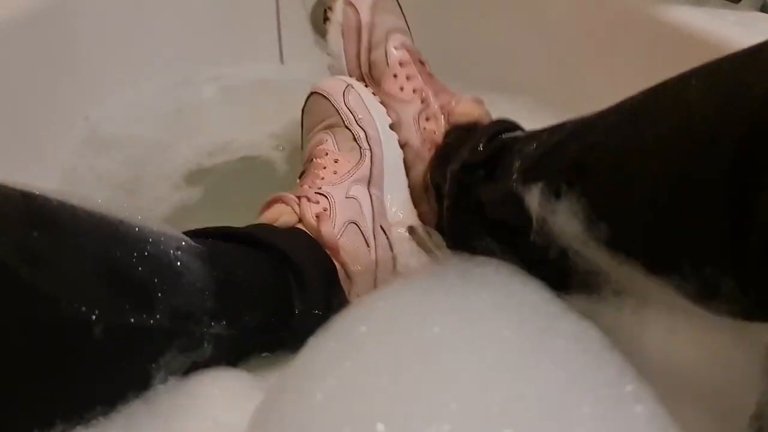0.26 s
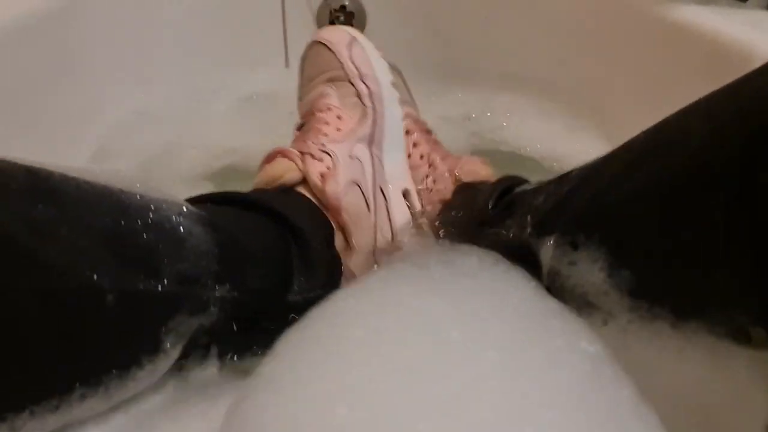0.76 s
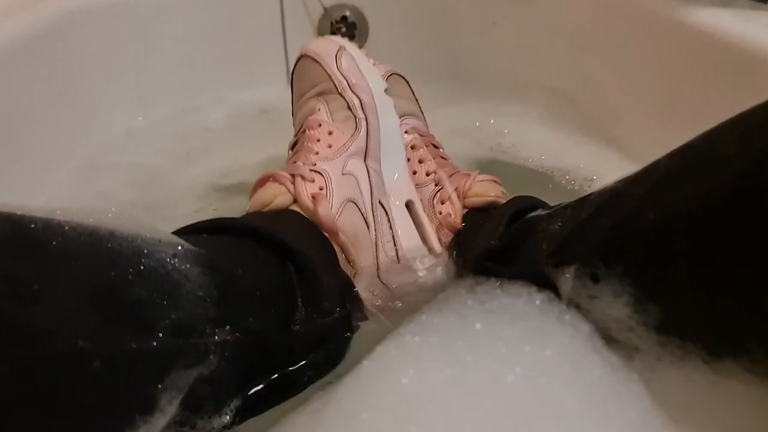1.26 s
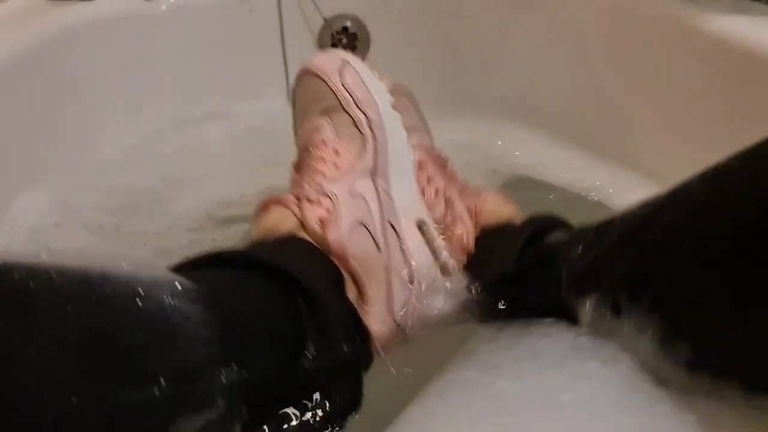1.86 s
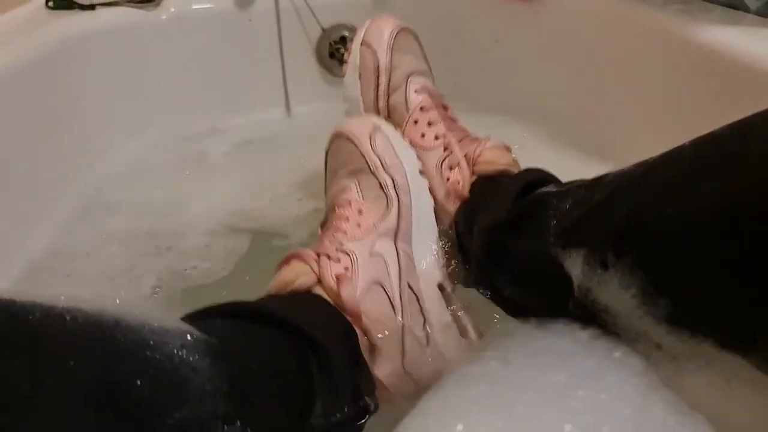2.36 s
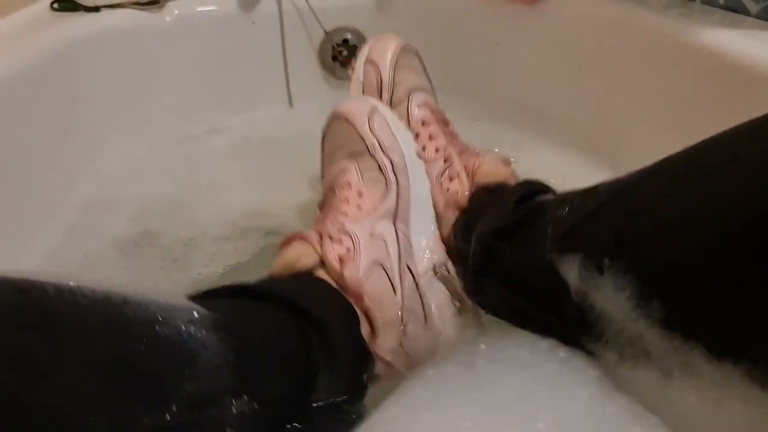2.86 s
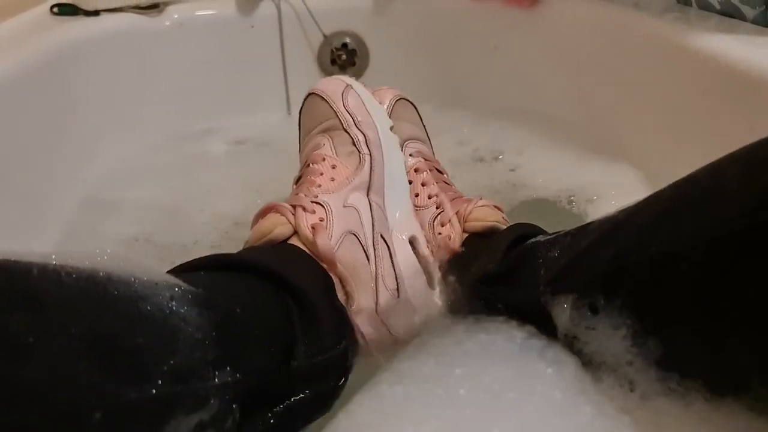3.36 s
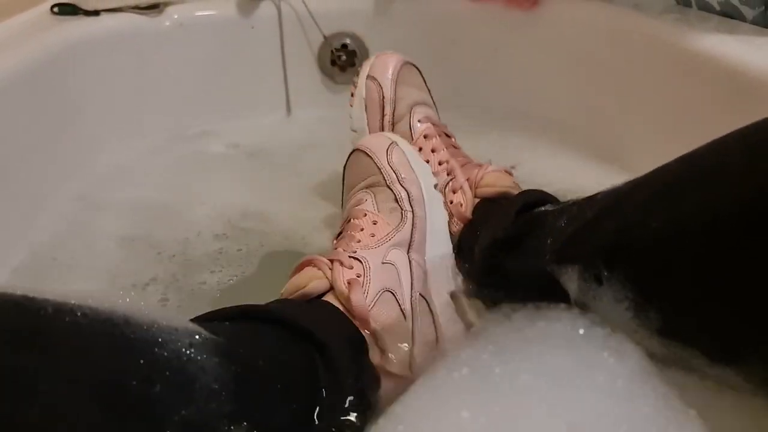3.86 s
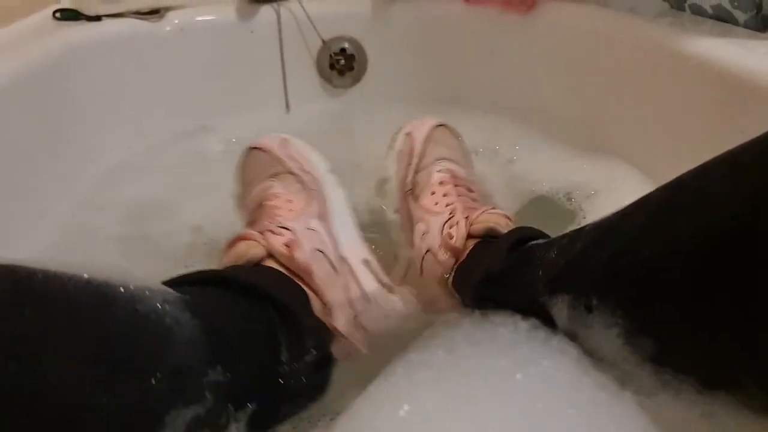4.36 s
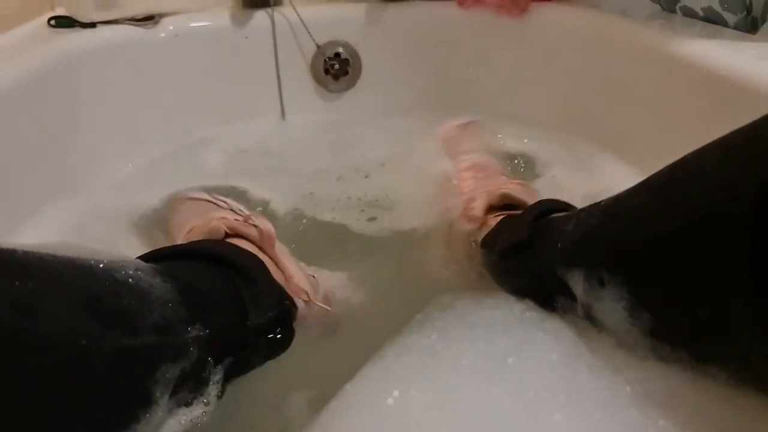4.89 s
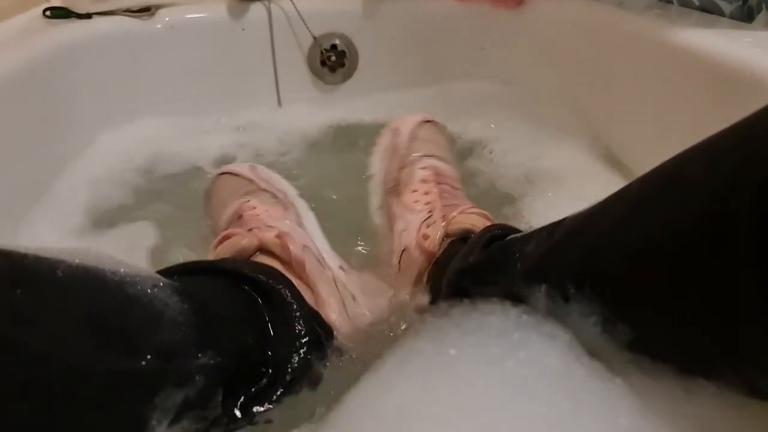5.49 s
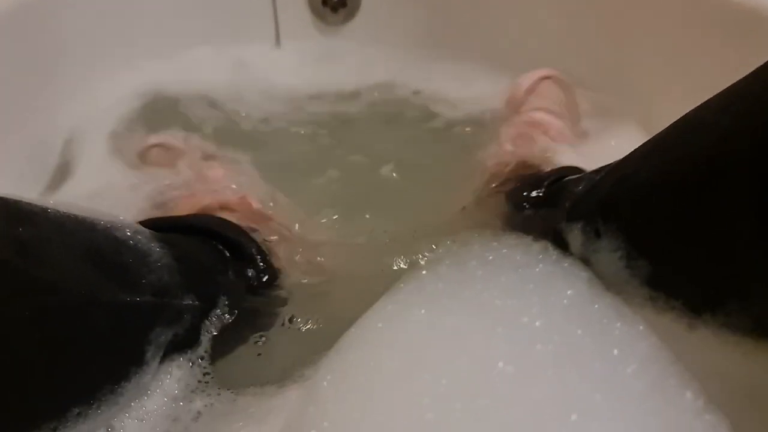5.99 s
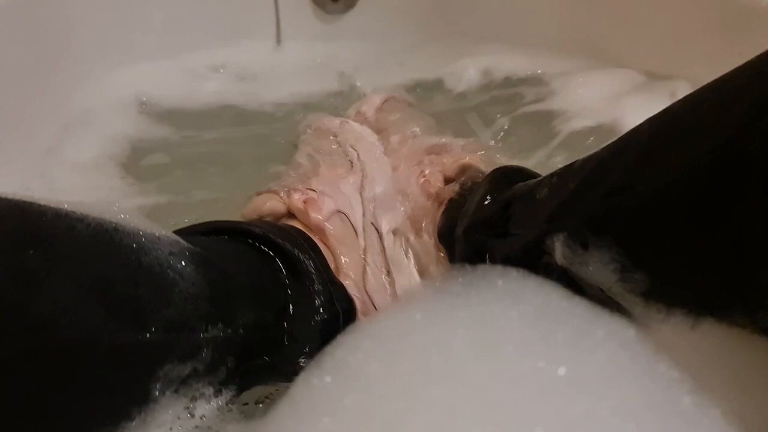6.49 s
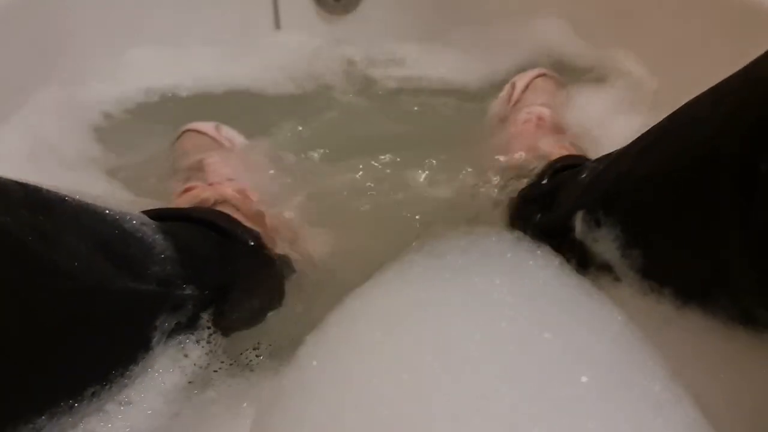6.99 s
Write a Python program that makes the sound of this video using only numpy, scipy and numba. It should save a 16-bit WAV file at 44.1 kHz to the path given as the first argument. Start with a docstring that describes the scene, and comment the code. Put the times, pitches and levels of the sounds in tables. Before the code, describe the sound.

Rubbery, stuttering chirps from soaked shoes come in uneven strokes over faint lapping water, followed by sloshing plunges and bubbling drips in a bathroom.

```python
"""Squeaks come first: two wet rubber-soled shoes rub in a filled bathtub, stroke after stroke, by stick-slip.
Then the feet plunge several times: the tub booms as low-pitched noise, and water churns, sprays and drips.
Churning, spray and drips are decaying sines of rising pitch, as bubbles ring; slaps are short noise bursts.
Tub echoes and a small tiled bathroom ring around a close stereo microphone, over rumble, hiss and foam."""
import sys
import numpy as np
from scipy import signal
from scipy.fft import rfft, irfft, next_fast_len
from scipy.io import wavfile
from scipy.ndimage import map_coordinates
from numba import njit

SR = 44100
rng = np.random.default_rng(int(sys.argv[2]) if len(sys.argv) > 2 else 0)


def master_out(mix):
    """Clip the mix to full scale and print it as 16-bit PCM to the path in sys.argv[1]."""
    frames = np.transpose(np.atleast_2d(mix))
    ceiling = np.clip(frames, -1, 1)
    pcm = np.round(ceiling * 32767).astype(np.int16)
    wavfile.write(sys.argv[1], SR, pcm)


N = 319284
T = np.arange(N) / SR  # time in seconds

# Slips of one sole on the other wet shoe, a few in each stroke of the feet.
# Each row: start in seconds, length in seconds, settled pitch in Hz, start relative to that pitch in
# semitones, level in dB before a common lift, roughness (0 is smooth, about 1 is harsh).
SQUEAKS = [ (-.025, 0.072, 1898, 1, -23.5, 0.82), (0.116, 0.021, 1016, 6.5, -31.5, 0.65),
           (0.324, 0.05, 2370, -2.5, -36.5, 0.38), (0.398, 0.037, 1750, 5, -40, 0.66),
           (0.588, 0.029, 2120, 2.5, -34, 1.1), (.616, 0.038, 3470, 2.5, -17, 0.32),
           (0.619, 0.047, 1786, -1.5, -20.5, 1.03), (.679, 0.039, 1442, 4.5, -18.5, 0.68),
           (0.966, 0.098, 1715, 3.5, -45.5, 0.7), (1.04, 0.036, 2150, 4, -35.5, 1),
           (1.235, 0.039, 2615, 2.5, -34, 1.02), (1.257, 0.057, 2228, 4, -30, 0.82),
           (1.306, 0.052, 1730, 0.5, -39.5, 0.5), (1.696, 0.041, 2200, -6.5, -40, 0.23),
           (1.738, 0.038, 1690, 3.5, -42, 1.1), (1.79, 0.042, 1646, 1.5, -39, 0.75),
           (1.936, 0.06, 1644, 6, -26.5, 0.91), (2.014, 0.032, 3397, 9.5, -20.5, 0.88),
           (2.055, 0.022, 3335, -0.5, -20, 1.2), (2.078, 0.014, 2133, 5, -19.5, 0.76),
           (2.303, 0.031, 2140, -1.5, -27.5, 0.47), (2.325, .02, 1422, 4, -12, 0.38),
           (2.351, 0.026, 1495, .5, -16, 0.52), (2.575, 0.071, 2583, 7, -25, 1.21),
           (2.639, .03, 3800, 0, -14.5, 0.4), (2.642, 0.026, 1740, 3, -18, 0.88),
           (2.686, .055, 2097, 4, -22.5, 1.1), (2.734, .014, 707, 7, -24, 1),
           (2.937, 0.049, 2800, -1, -39.5, 0.94), (3.026, 0.04, 3240, -0.5, -35.5, 1.23),
           (3.064, .028, 1710, 2.5, -32, 1.11), (3.204, 0.052, 1401, 2.5, -35, 0.51),
           (3.22, .036, 1190, 4, -28.5, 1.02), (3.258, 0.027, 1950, 3.5, -25, 0.8),
           (3.286, 0.027, 1841, 1.5, -16, 0.37), (3.307, 0.048, 1363, 4.5, -19, 0.59),
           (3.855, 0.048, 2496, -4.5, -33, 0.69), (3.92, 0.029, 2486, 1.5, -30.5, 1.13),
           (3.934, 0.033, 1465, 4.5, -36, 1.14), (4.32, 0.061, 5800, 0, -63, .4)]
# Stereo balance of the shoes. Each row: frequency in Hz, left minus right in dB.
SHOE_BALANCE = [(600, 11), (1300, -3), (2500, -0.5), (5000, -3.5), (8000, -2), (12000, -1.7)]
# A rough slip puts its energy in the overtones; a high one whistles almost purely.
SMOOTH_OVERTONE_DB, ROUGH_OVERTONE_DB = -5.5, 8
WHISTLE_HZ, WHISTLE_DB_PER_OCTAVE = 2626, -47.5


def shoes(places=3):
    """Moving source: the contact travels during a slip, so the pattern of echoes changes with it."""
    out = np.zeros((2, N))
    for s, length, hz, glide, db, rough in SQUEAKS:
        overtone_db = SMOOTH_OVERTONE_DB + rough ** 2 * (ROUGH_OVERTONE_DB - SMOOTH_OVERTONE_DB)
        overtone_db += WHISTLE_DB_PER_OCTAVE * max(np.log2(hz / WHISTLE_HZ), 0)
        start_hz = hz * 2 ** (glide / 12)
        slip = squeak(length, start_hz, hz, overtone_db, rough)
        slip = slip / np.hypot(1, undb(overtone_db))
        # the contact passes a few places, each with its own echoes
        place = np.linspace(0, places - 1, len(slip))
        lag = rng.uniform(.00005, .0007)
        heard = 0
        for k in range(places):
            nearness = np.sqrt(np.maximum(1 - abs(place - k), 0))
            heard = heard + bathroom(slip * nearness, SHOE_BALANCE,
                                     direct_db=-5.5, tub_db=-5.0, room_db=0.0, lag=lag)
        # the echoes spread the energy of the slip out in time
        same_energy = np.sqrt(np.sum(slip ** 2) / np.sum(heard ** 2))
        add(out, s, undb(db + 2.5) * heard * same_energy)
    return out


# How the shoe radiates the overtones. Each row: frequency in Hz, gain in dB.
SHOE_RADIATION = [(1300, 7), (1800, 10.5), (2500, 4.5), (3700, 0.5), (5000, 1), (6500, -1.5), (8000, -10.5),
                  (11000, -10), (13000, -18), (16000, -24.5)]
SWELL_SHARE = 0.085  # part of a slip that the grip takes to build up
EDGE_SWELL_S = 0.012  # a slip starts as a pure tone; its harsh edge grows with this time constant
CATCH_CHIRP, PITCH_JITTER = 0.261, 0.04086  # shares of the pitch: fall in a catch at roughness 1, and chance
SLIP_BLUR_RAD, TEAR_SHARE = 0.46, 0.8  # at roughness 1: timing scatter of slips, hiss added to the edge


def squeak(length, start_hz, end_hz, overtone_db, rough):
    """Stick-slip friction: the pitch settles as the sole slides, and uneven slips smear the overtones."""
    t = np.arange(int(length * SR)) / SR
    hz = end_hz + (start_hz - end_hz) * np.exp(-3.5 * t / length)
    # the grip catches and lets go about every 14 ms, each time with a small falling chirp
    catch = (70 * t + .3 * walk(t, 60)) % 1
    hz = hz * (1 + rough * CATCH_CHIRP * (.5 - catch) + PITCH_JITTER * walk(t, 260))
    phase = 2 * np.pi * np.cumsum(hz) / SR
    # single slips come early or late, which blurs the high overtones most
    slips = phase + rough * SLIP_BLUR_RAD * walk(t, 1100)
    tone = unit(np.sin(phase + .3 * (slips - phase)))
    overtones = 0
    for k in range(2, 13):
        strength = k ** -.34 * undb(on_log(SHOE_RADIATION, k * hz))
        overtones = overtones + strength * (k * hz < SR * .45) * np.sin(k * slips)
    # each slip also tears the water film with a tiny hiss
    tears = rng.standard_normal(len(t)) * (1 + np.cos(phase)) ** 2 * undb(6 * waver(t, 700))
    hiss = unit(colour(tears, SHOE_RADIATION))
    edge = unit(unit(overtones) + (.25 + TEAR_SHARE * rough) * hiss)
    # keep the edge above the pitch, with a slight lift of the top
    lowest = min(end_hz, 1600)
    edge = colour(edge, [(1.1 * lowest, -24), (1.6 * lowest, 0)])
    edge = colour(edge, [(300, 0), (6500, 0), (11000, 1)])
    edge = edge * unit(1 - np.exp(-t / EDGE_SWELL_S))
    rise = max(SWELL_SHARE * length, .001)
    grip = np.clip(t / rise, 0, 1) * np.clip((length - t) / 0.0062, 0, 1)
    flutter = unit(undb(5 * waver(t, 167.7)))
    slip = grip * flutter * (tone + undb(overtone_db) * edge)
    # nothing rings far below the pitch of the slip
    high_pass = signal.butter(4, 0.88 * min(start_hz, end_hz), "high", fs=SR, output="sos")
    return signal.sosfilt(high_pass, slip)


# Colour of the creeping sole. Each row: frequency in Hz, gain in dB.
CREEP_COLOUR = [(1200, -2), (2000, 6), (5000, 0.5), (8000, -7.5), (12000, -14.5), (16000, -10)]
# The wet sole creeps before and after a slip: level beside a slip of -30 dB, and dB per dB of the slip.
CREEP_DB, CREEP_FOLLOW = -52, .4


def creep():
    """Friction noise: the water film between the shoes fizzes softly as they press towards each slip."""
    pressure = 0
    for s, length, _, _, db, _ in SQUEAKS:
        level = undb(CREEP_DB + CREEP_FOLLOW * (db + 30))
        pressure = pressure + level * surge(s + length / 2, rise=0.036, decay=0.016)
    uneven = rng.standard_normal(N) * undb(5 * waver(T, 300))
    fizz = unit(colour(uneven, CREEP_COLOUR))
    return bathroom(pressure * fizz, SHOE_BALANCE, direct_db=-3.5, tub_db=-6, room_db=-1.5, lag=0.00039)


# A foot or a returning wave heaves the water up. Each row: crest in seconds, churn level in dB and
# spray level in dB before the mix, rise and decay time constants in seconds.
SURGES = [(5.16, -62, -59.5, 0.15, 0.066), (5.22, -29.5, -36.5, 0.017, 0.11),
          (5.462, -35.5, -42, 0.057, 0.022), (5.508, -40, -31.5, 0.0074, 0.043),
          (5.67, -55, -49.5, 0.024, 0.21), (6.105, -54, -115, .004, 0.054), (6.38, -28.5, -30, 0.038, 0.12),
          (6.643, -33.5, -34.5, 0.037, 0.07), (6.789, -48, -44, 0.018, 0.19),
          (6.976, -49, -40, 0.038, 0.12), (7.132, -47, -45, 0.0097, 0.033)]
# Gentle lapping around the legs. Each row: time in seconds, level in dB before the mix.
LAPPING = [(0, -48.5), (.4, -54), (.9, -59.5), (1.3, -58.5), (1.6, -61), (2.3, -60.5), (3.0, -58),
           (3.7, -72), (3.98, -53), (4.15, -72), (4.4, -62.5), (4.85, -71), (5.0, -67.5), (7.24, -68.5)]
# Water slapping on water and shoes. Each row: start in seconds, level in dB, centre frequency in Hz.
SLAPS = [(4.929, -45.5, 4940), (5.206, -38, 3000), (5.501, -33, 2260), (5.515, -26, 3270),
         (5.66, -31.5, 2980), (5.856, -34, 1570), (6.358, -33, 4640), (6.619, -29.5, 2020),
         (6.785, -35, 4000), (7.127, -39.5, 4860)]
# Colours of the big bubbles and of the fine droplets. Each row: frequency in Hz, gain in dB.
CHURN_COLOUR = [(150, -8.5), (230, 4), (400, 1.5), (700, 3), (1300, 4), (2200, -4.5), (4000, -11.5),
                (8000, -39)]
SPRAY_COLOUR = [(700, -9.5), (1600, 1.5), (3000, 4), (4500, -0.5), (6500, -2.5), (7800, -13.5),
                (11500, -9.5), (16000, -19)]
SPRAY_LINGER = 0.7  # decay time of the spray as a share of that of the churning


def water():
    """Bubble acoustics: surges churn clumps of big bubbles and throw droplets; slaps are short bursts."""
    heave = sum(undb(db) * surge(s, rise, decay) for s, db, _, rise, decay in SURGES)
    spray = sum(undb(db) * surge(s, rise, SPRAY_LINGER * decay) for s, _, db, rise, decay in SURGES)
    lapping = swell(LAPPING)
    bubbles = swarm(low_hz=200, high_hz=4000, cycles=14, spread_db=4.8, count=3200)
    churn = unit(colour(bubbles, CHURN_COLOUR))
    droplets = unit(swarm(low_hz=700, high_hz=15000, cycles=5, spread_db=4.8, count=26000))
    # the churning swings from gulp to gulp
    gulps = unit(undb(6.5 * waver(T, 45)))
    out = churn * (undb(-3.5) * heave * gulps + undb(-0.5) * lapping)
    clumps = unit(undb(4 * waver(T, 70)))
    # even the lapping flicks up a little spray
    thrown = undb(2.5) * spray + undb(-6.0) * lapping
    out += unit(colour(droplets, SPRAY_COLOUR)) * thrown * clumps
    t = T[:SR // 4]
    for s, db, hz in SLAPS:
        band = signal.butter(2, [hz / 1.7, hz * 1.7], "band", fs=SR)
        splash = np.roll(droplets, -int(s * SR))[:len(t)] + rng.standard_normal(len(t))
        burst = unit(signal.lfilter(*band, splash))
        add(out, s, undb(db) * burst * np.exp(-t / 0.0069))
    return out


def surge(crest, rise, decay):
    """Exponential envelope: the gain grows up to its crest, then dies away."""
    return np.exp(-np.maximum((crest - T) / rise, (T - crest) / decay))


def swarm(low_hz, high_hz, cycles, spread_db, count):
    """Random superposition: a steady stream of bubbles of all sizes, most faint and a few strong."""
    when, size, strength, life = rng.random((count, 4)).T
    hz = low_hz * (high_hz / low_hz) ** size
    gain = undb(-spread_db * np.log(strength * .98 + .02)) * hz
    return ring(np.column_stack([when * N / SR, hz, gain, cycles * (.5 + life)]), 0.21)


@njit
def ring(rows, rise):
    """Bubble resonance: sines die by 50 dB over their cycles while the pitch rises by a share of itself."""
    out = np.zeros(N)
    for s, hz, size, cycles in rows:
        start = int(s * SR)
        n = int(cycles * SR / hz) + 2
        phase = 0.
        for i in range(min(n, N - start)):
            phase += 2 * np.pi * hz * (1 + rise * i / n) / SR
            out[start + i] += size * np.exp(-5.75 * i / n) * np.sin(phase)
    return out


# Single bubbles and drops. Each row: start in seconds, starting pitch in Hz, peak level in dB before
# the room, duration in cycles of the starting pitch.
BUBBLES = [ (.193, 1110, -34.5, 6.5), (.272, 1890, -29.5, 18), (0.379, 564, -28, 2.8),
           (0.508, 2940, -26, 25), (0.534, 2250, -29, 26), (1.562, 960, -29, 4.5), (1.615, 642, -48.5, 88),
           (1.674, 920, -32.5, 2), (4.929, 4550, -36.5, 18), (5.222, 362, -28, 22), (5.246, 1060, -25, 12),
           (5.426, 2050, -23, 25), (5.467, 1790, -22.5, 20), (5.503, 1030, -22, 14),
           (5.527, 1340, -18.5, 14), (5.574, 2340, -21.5, 63), (5.66, 865, -36, 23), (5.718, 1280, -35, 55),
           (5.796, 767, -33.5, 47), (6.379, 5270, -15.5, 34), (6.574, 905, -26.5, 14),
           (6.619, 224.3, -35.5, 37), (6.626, 1780, -12, 3.8), (6.651, 900, -21.5, 7.7),
           (6.784, 1420, -26.5, 39), (6.797, 1980, -23.5, 76), (6.832, 1560, -22.5, 23),
           (7.128, 980, -29.5, 7.1), (7.156, 560, -43.5, 34)]


def drops():
    """Bubble resonance: single bubbles ring out of the wash."""
    s, hz, db, cycles = np.transpose(BUBBLES)
    return ring(np.column_stack([s, hz, undb(db), cycles]), 0.21)


# Low thumps: legs stir the water during the strokes, later the feet plunge and the tub booms.
# Each row: start in seconds, level in dB, decay time constant in seconds.
THUMPS = [(2, -48, 0.062), (2.603, -53, 0.14), (3.049, -44, 0.047), (5.204, -28, 0.052),
          (6.1, -33.5, 0.091), (6.388, -34, 0.054), (6.621, -58, 0.16)]
# Low tones of the water and tub. Each row: frequency in Hz, gain in dB.
BOOM = [(25, -10), (45, -28.5), (70, 0), (100, -2), (128, 2), (165, -18.5), (205, 1.5), (250, -29.5),
        (330, -22.5), (500, -28), (1100, -29.5), (2500, -65.5)]


def thumps():
    """Low-frequency resonance: stirring legs and plunging feet shake water and tub; lapping does so faintly."""
    out = undb(-5.5) * diffuse(BOOM, N) * swell(LAPPING)
    t = T[:SR // 2]
    for s, db, decay in THUMPS:
        envelope = np.minimum(t / 0.013, 1) * np.exp(-t / decay)
        add(out, s, undb(db) * diffuse(BOOM, len(t)) * envelope)
    return out


# Spectrum of the house rumble and hiss. Each row: frequency in Hz, gain in dB.
FLOOR = [(12, -52), (20, -3.5), (96, 5.5), (216, -11), (277, -20.5), (357, -5), (422, -21), (678, -14),
         (949, -34.5), (1330, -15), (1860, -31), (5850, -26.5), (9140, -41.5), (14700, -48), (16000, -42.5)]


def background():
    """Diffuse field: low house rumble under a wide faint hiss, with the crackle of foam."""
    sides = [unit(swarm(low_hz=2000, high_hz=12000, cycles=4, spread_db=6, count=2500)) for _ in range(2)]
    foam = np.array(sides)
    return undb(-59.5) * diffuse(FLOOR, N) + undb(-81) * foam


def diffuse(points, size):
    """Interchannel coherence: stereo noise of mid rms 1, with a side part that varies over frequency."""
    mid, side = colour(rng.standard_normal((2, size)), points)
    side = colour(side, [(25, -7), (60, -9), (140, -19.5), (230, -9.5), (500, 4)])
    return (mid + np.array([[1], [-1]]) * side) / np.std(mid)


def bathroom(x, balance, direct_db, tub_db, room_db, lag):
    """Room impulse response: direct sound, a cluster of hard tub-wall echoes, then the tiled room."""
    t = T[:24000]
    noise = rng.standard_normal((2, len(t)))
    low = signal.lfilter(*signal.butter(1, 4000, fs=SR), noise)
    # 60 dB decay times in seconds: 0.3 for the lows, 0.41 for the highs
    tail = low * 1000 ** (-t / 0.3) + (noise - low) * 1000 ** (-t / 0.41)
    tail = tail * np.clip(t / 0.011, 0, 1)
    sparse = rng.standard_normal(noise.shape) * (rng.random(noise.shape) < .02)
    echoes = sparse * (t > .002) * np.exp(-t / .014)
    response = (undb(room_db) * unit(tail) + undb(tub_db) * unit(echoes)) / np.sqrt(len(t))
    # the direct sound reaches the right side lag seconds later
    response[0, 0] += undb(direct_db)
    response[1, int(lag * SR)] += undb(direct_db)
    heard = signal.fftconvolve(x[None], response, axes=1)
    size = next_fast_len(heard.shape[1])
    difference_db = on_log(balance, np.fft.rfftfreq(size, 1 / SR))
    lean = undb(np.array([[.5], [-.5]]) * difference_db)
    return irfft(rfft(heard, size) * lean, size)[:, :N]


def undb(db):
    """Level definition: decibels to amplitude gain."""
    return 10 ** (np.asarray(db) / 20)


def unit(x):
    """Effective value: scale to rms 1."""
    return x / np.sqrt(np.mean(x ** 2) + 1e-18)


def add(track, s, x):
    """Superposition: mix x into the track at time s, dropping what falls outside."""
    i = int(s * SR)
    x = x[..., max(-i, 0):]
    i = max(i, 0)
    track[..., i:i + x.shape[-1]] += x[..., :N - i]


def on_log(points, hz):
    """Logarithmic interpolation: read (Hz, value) points on a log-frequency axis."""
    f, value = np.transpose(points)
    return np.interp(np.log(hz + 1), np.log(f), value)


def colour(x, points):
    """Spectral shaping: filter by (Hz, dB) points, falling away under the first."""
    hz = np.fft.rfftfreq(x.shape[-1], 1 / SR)
    gain = undb(on_log(points, hz)) * np.minimum(hz / points[0][0], 1) ** 2
    return irfft(rfft(x) * gain, x.shape[-1])


def swell(curve):
    """Level envelope: gain of an (s, dB) curve, practically silent outside it."""
    s, db = np.transpose(curve)
    return undb(np.interp(T, s, db, left=-120, right=-120))


def walk(t, rate):
    """Band-limited randomness: smooth chance with spread near 1, changing rate times a second."""
    return map_coordinates(rng.standard_normal(4096), [t * rate], order=3, mode="wrap")


def waver(t, rate):
    """Saturation: smooth chance that stays within -1 and 1."""
    return np.tanh(walk(t, rate))


# Stereo balance of the water and drops. Each row: frequency in Hz, left minus right in dB.
WATER_BALANCE = [(200, 1.5), (700, -0.1), (2000, -.5), (12000, -2.6)]


def scene():
    """Direct-to-reverberant ratio: shoes at the far end of the tub, water all around, drops close by."""
    wash = bathroom(water(), WATER_BALANCE, direct_db=-5, tub_db=-3, room_db=-3, lag=.00014)
    drips = bathroom(drops(), WATER_BALANCE, direct_db=1, tub_db=-4, room_db=-3, lag=.0002)
    return shoes() + creep() + wash + drips + thumps() + background()


def record(dry):
    """Band limiting: a steep elliptic low-pass removes everything above 15.9 kHz."""
    low_pass = signal.ellip(10, .2, 80, 15900, fs=SR, output="sos")
    return signal.sosfilt(low_pass, dry)


dry = scene()
out = record(dry)
master_out(out)
```